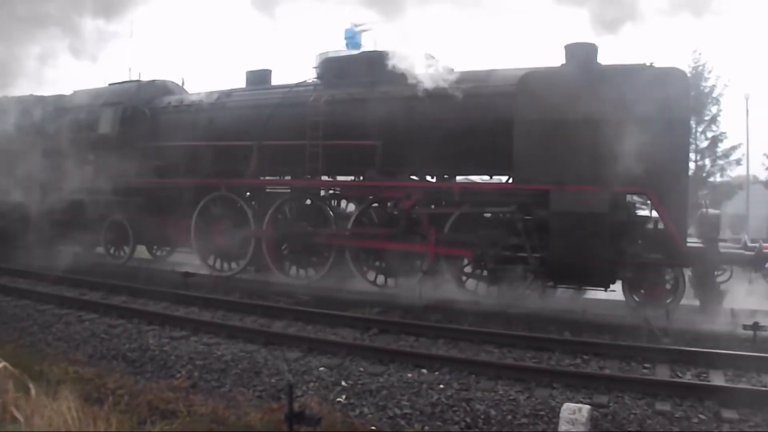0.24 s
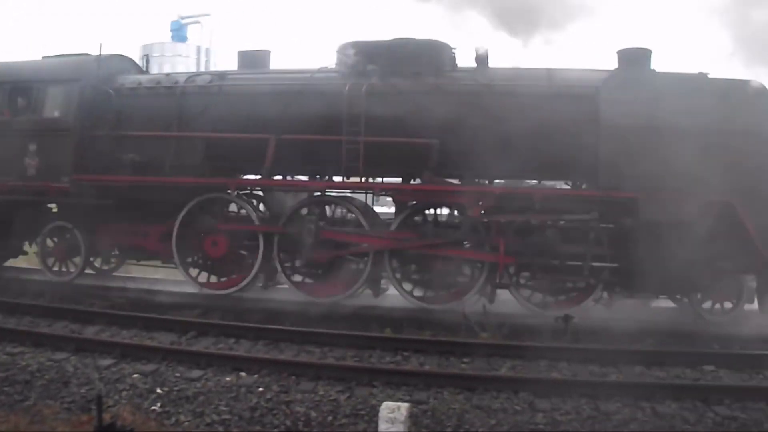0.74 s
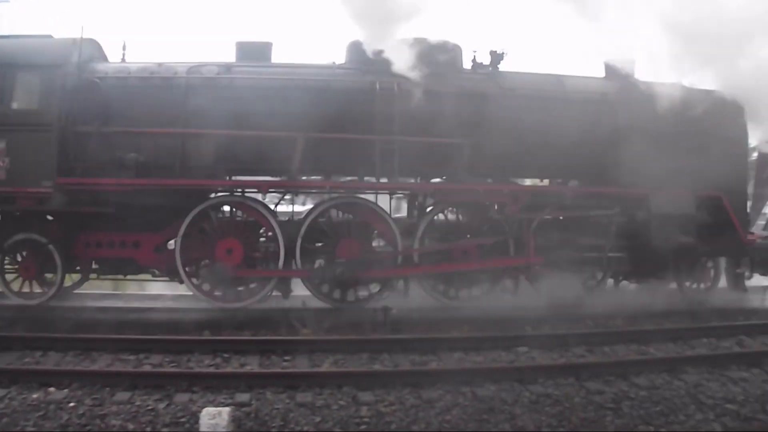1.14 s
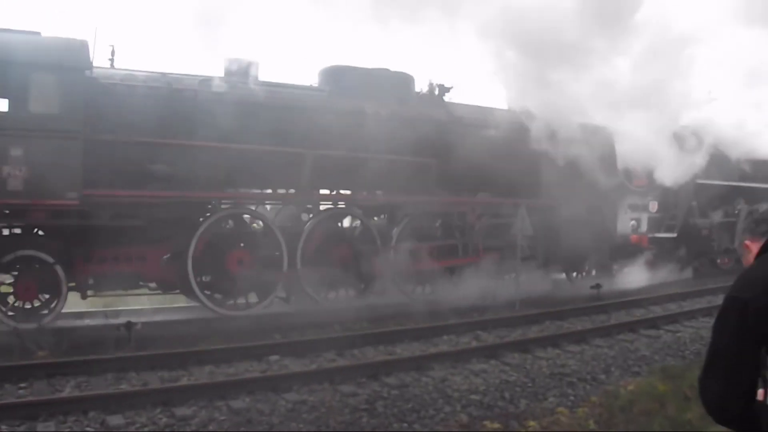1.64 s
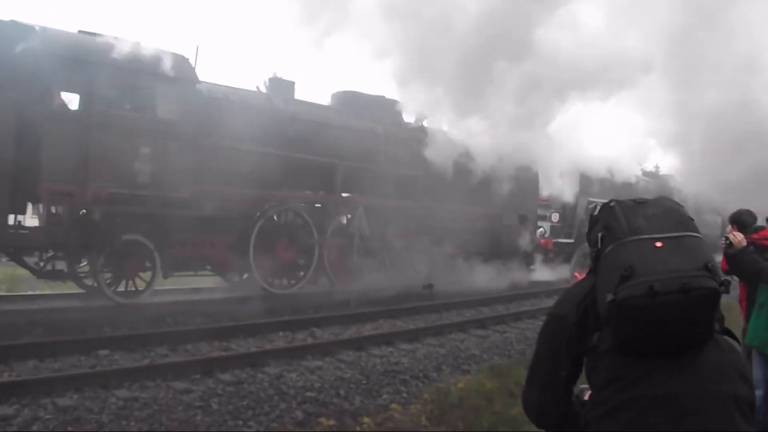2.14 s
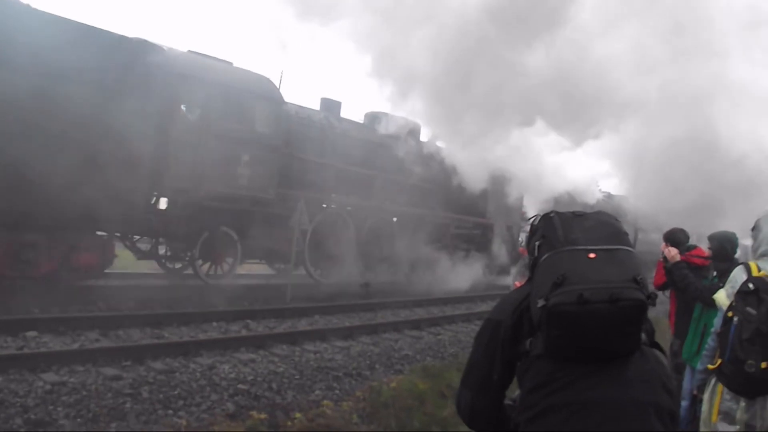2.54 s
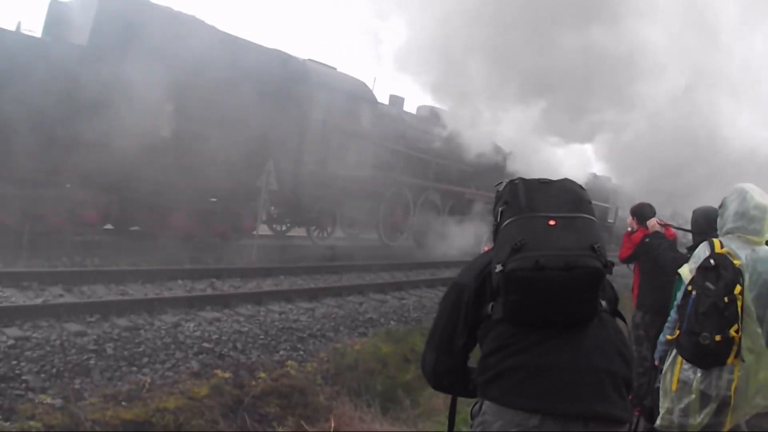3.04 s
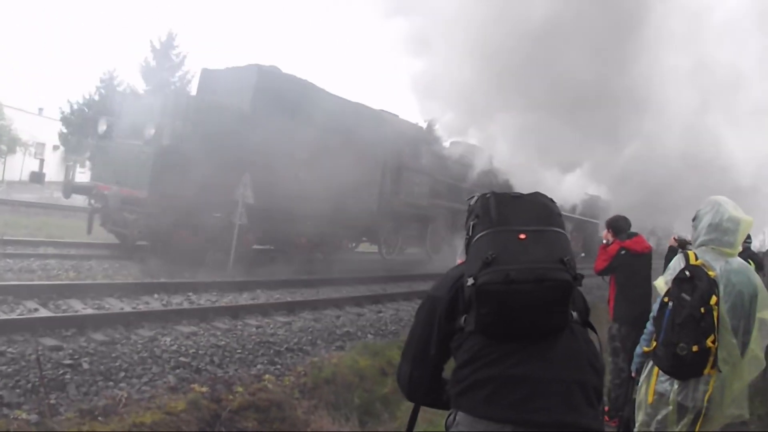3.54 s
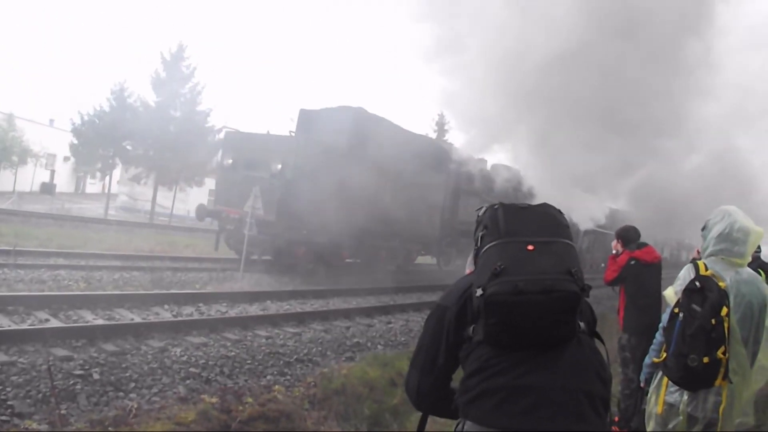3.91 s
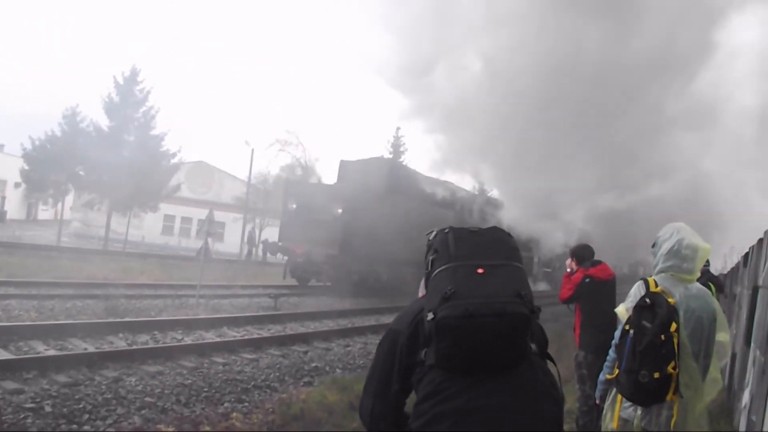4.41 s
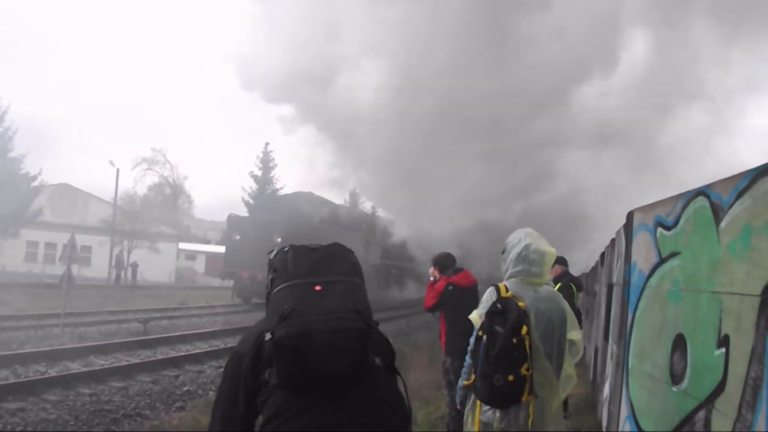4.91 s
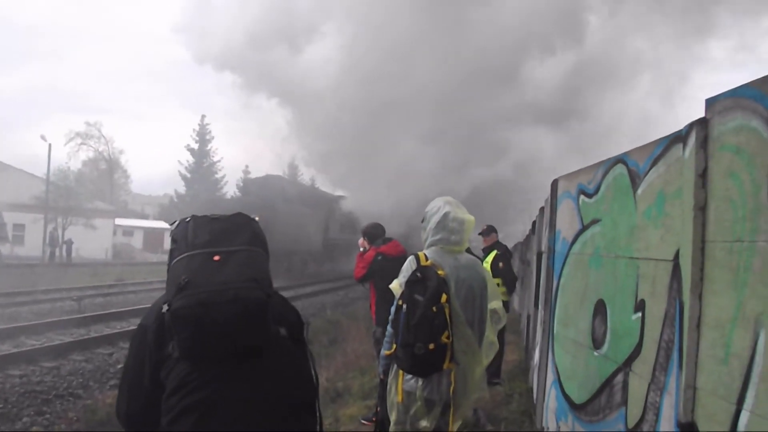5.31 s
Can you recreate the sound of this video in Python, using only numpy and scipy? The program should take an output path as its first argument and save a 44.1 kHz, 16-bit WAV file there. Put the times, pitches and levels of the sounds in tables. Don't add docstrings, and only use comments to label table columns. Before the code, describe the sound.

Several steam locomotive whistles blow together in one long, wavering, dissonant chord over hissing steam and wind rumble, with one harsh crack near the start.

```python
import sys
import numpy as np
from scipy import signal
from scipy.fft import rfft, irfft, next_fast_len
from scipy.io import wavfile
from scipy.ndimage import uniform_filter1d

SR = 44100
rng = np.random.default_rng(int(sys.argv[2]) if len(sys.argv) > 2 else 0)


def persist_wave(psi):
    counts = np.round(np.clip(psi, -1, 1) * 32767).astype(np.int16)
    wavfile.write(sys.argv[1], SR, np.atleast_2d(counts).T)


def rack_gain(trim_db):
    fader = np.asarray(trim_db, float)
    return 10 ** (fader / 20)


N = 245195


def in_time(rows):
    s, *columns = np.transpose(rows)
    return [np.interp(np.arange(N) / SR, s, column) for column in columns]


def bumps(rows):
    t = np.arange(N) / SR
    return sum(db * np.exp(-((t - s) / half_s) ** 2) for s, half_s, db in rows)


def drift(rate_hz, size=N):
    r = np.exp(-80 * np.pi * rate_hz / SR)
    coarse = rng.standard_normal(N // 40 + 2002)
    slow = signal.lfilter([1], [1, -2 * r, r * r], coarse)[2000:]
    return np.interp(np.arange(size) / 40, np.arange(len(slow)), slow / slow.std())


def whistle(pitch_hz, harmonics, wobble, rough, rough_hz):
    size = len(pitch_hz)
    unsteady_hz = pitch_hz * (1 + wobble * drift(8.18, size))
    phase = 2 * np.pi * np.cumsum(unsteady_hz) / SR
    out = np.zeros(size)
    for k, level_db in harmonics:
        shake = rough * k ** 0.55
        along = 1 + shake * drift(rough_hz, size)
        across = shake * drift(rough_hz, size)
        tone = along * np.sin(k * phase) + across * np.cos(k * phase)
        out += rack_gain(level_db) * np.sqrt(2 / (1 + 2 * shake ** 2)) * tone
    return out


def ground_echo_db(k, favoured):
    width = 0.51
    first = np.exp(-((k - favoured) / width) ** 2)
    higher = np.exp(-3.7 * ((k / 2.3 - favoured) / width) ** 2)
    return 10 * (first + 0.6 * higher)


# [s, Hz, dB, dB, number].
DEEP = [ (0, 404.4, -13, -30.5, 2.8), (.43, 403.1, -13.5, -34.5, 2.63), (.57, 402.5, -11, -30.5, 2.46),
        (.86, 406, -12.5, -31, 3.1), (1.3, 405.7, -15.5, -33.5, 3.12), (1.57, 407.2, -16.5, -27, 2.8),
        (1.76, 407.3, -29.5, -23.5, 3.14), (1.88, 407.2, -17.5, -21.5, 3.4), (2.15, 404.7, -20.5, -27, 3.3),
        (2.33, 405.6, -25, -22.5, 4.8), (2.75, 406.6, -21.5, -27, 4.05), (3.2, 407.4, -25.5, -25, 5),
        (3.45, 407, -26, -32.5, 4.04), (4.04, 408.9, -21, -33.5, 3.13), (4.4, 409.2, -26.5, -37.5, 3.22),
        (4.8, 405.5, -23.5, -43, 3.1), (5.25, 408, -21.5, -32, 3.44), (5.56, 408.3, -24.5, -36.5, 3.8)]
# [number, dB].
DEEP_LOW = [(2, -0.3), (3, -2), (4, -1.5)]
DEEP_TOP = [(5, -10.5), (6, -5), (7, -11.5), (8, -11.5), (9, -23.5), (10, -27.5)]


def deep():
    pitch_hz, level_db, over_db, favoured = in_time(DEEP)
    harmonics = [(1, level_db)]
    for k, db in DEEP_LOW:
        fading_db = 1.5 * drift(2.9)
        harmonics.append((k, over_db + db + ground_echo_db(k, favoured) + fading_db))
    shared_db = 0.55 * ground_echo_db(4, favoured)
    for k, db in DEEP_TOP:
        fading_db = 1.5 * drift(1.0)
        harmonics.append((k, over_db + db + ground_echo_db(k, favoured) + shared_db + fading_db))
    return whistle(pitch_hz, harmonics, wobble=0.00144, rough=0.13, rough_hz=13.0)


# [s, Hz, dB, dB].
SECOND = [ (0, 447, -39, -36.5), (.23, 452, -37, -36), (.43, 452.5, -35.5, -35), (.6, 454, -32.5, -40),
          (1.2, 451.3, -25, -35.5), (1.51, 451.7, -23.5, -30), (1.9, 450.5, -27, -35.5),
          (2.1, 447.5, -23.5, -31.5), (2.47, 449.8, -25.5, -25), (2.85, 450.4, -22.5, -27),
          (3.05, 448.4, -22, -24), (3.3, 450, -22, -23.5), (3.85, 451, -28.5, -28), (4.08, 448, -24.5, -32),
          (4.2, 451, -33.5, -31), (4.58, 449.3, -25.5, -30), (5.0, 452.6, -36.5, -30.5),
          (5.56, 451, -27, -26.5)]
# [number, dB].
SECOND_TOP = [(2, -16), (3, -0.5), (4, -2.5), (5, -5.5), (6, -3.5), (7, 0), (8, -26)]
# [s, dB per harmonic].
SECOND_BITE = [(0, 1.5), (.25, 2.5), (.7, -2), (1.2, -0.5), (1.9, -2.5), (2.4, 0.7), (3.3, -0.3),
               (3.9, 0.7), (4.1, -0.6), (4.9, 3), (5.4, -0.3)]


def second():
    pitch_hz, level_db, over_db = in_time(SECOND)
    tilt_db = in_time(SECOND_BITE)[0]
    harmonics = [(1, level_db)]
    for k, db in SECOND_TOP:
        harmonics.append((k, over_db + db + (k - 5) * tilt_db + 1.4 * drift(1.1)))
    return whistle(pitch_hz, harmonics, wobble=0.00154, rough=0.13, rough_hz=13.4)


def blast(rows, pipe, edge_db, turn_s):
    (second_db, fourth_db), top = pipe
    span = slice(round(rows[0][0] * SR), round(rows[-1][0] * SR))
    pitch_hz, first_db, third_db = [column[span] for column in in_time(rows)]
    force_db = 10 * np.log10(rack_gain(first_db) ** 2 + rack_gain(third_db) ** 2)
    facing_db = in_time([(turn_s - 0.17, -11), (turn_s, 0)])[0][span]
    edge = force_db + edge_db + facing_db
    harmonics = [(1, first_db), (2, third_db + second_db), (3, third_db), (4, third_db + fourth_db)]
    harmonics += [(k, edge + db) for k, db in top]
    valve_s = 0.006
    valve = signal.windows.tukey(len(pitch_hz), 2 * valve_s * SR / len(pitch_hz))
    out = np.zeros(N)
    out[span] = valve * whistle(pitch_hz, harmonics, wobble=0.0008, rough=0.115, rough_hz=16)
    return out


# harmonic number,
# level over the bright edge in dB [number, dB]. Air dulls the top of the far one.
OPEN_PIPE = (-14, -7), [(5, -2), (6, 0), (7, -4), (8, -12.5), (9, -19), (10, -20), (12, -26.5)]
OPEN_PIPE_FAR = (-14.5, -6.5), [(5, 3), (6, 3.5), (7, -7.5), (8, -17.5), (9, -33)]
STOPPED_PIPE = (-12, -13), [(5, 2), (6, -20)]
# [s, Hz, dB, dB].
NEAR_BLAST = [(.1, 843, -40, -38), (.25, 834, -28, -27.5), (.8, 830, -28.5, -23),
              (.95, 823.5, -33.5, -31.5), (1.06, 824.4, -23.5, -29), (1.5, 827.4, -21, -25),
              (1.65, 824, -24.5, -19.5), (1.77, 820, -27, -19), (1.88, 766, -37, -44)]
HIGH_BLAST = [(0, 908.7, -40, -24), (.44, 907.8, -34.5, -34), (.85, 914.6, -36.5, -23.5),
              (1.05, 910.5, -24.5, -26), (1.3, 904, -28.5, -33.5), (1.55, 914, -27, -21),
              (1.635, 908, -33, -32), (1.68, 849, -21, -33), (1.73, 760, -55, -41)]
WARM_UP = [(2.3, 792, -62, -43), (2.45, 784.5, -25.5, -33), (2.7, 798.3, -29, -42.5), (3.1, 799, -27, -30),
           (3.3, 788, -31.5, -29), (3.36, 821, -19, -25)]
LONG_BLAST = [(3.36, 812, -18, -26), (3.449, 826, -20.5, -20), (3.7, 820.6, -22.5, -20.5),
              (4.05, 828.5, -17, -20.5), (4.299, 821.6, -23.5, -15), (4.7, 826, -22.5, -18.5),
              (4.898, 827, -21.5, -23.5), (5.098, 829.7, -23.5, -23), (5.56, 827, -25.5, -20)]
LOW_BLAST = [(2.7, 712.4, -38, -55), (2.8, 751, -32, -55), (3.1, 751, -31.5, -39), (3.45, 780, -39.5, -54),
             (4.3, 778, -34, -53), (5.2, 810, -50, -48)]
LATE_BLAST = [(3.45, 803, -33, -51), (3.55, 783, -26, -23.5), (4.0, 799.3, -34.5, -37.5),
              (4.45, 798.2, -28, -30.5), (4.55, 823, -23, -19), (4.65, 820, -38, -37),
              (4.85, 826.3, -36, -13)]
RISING_BLAST = [(4.85, 822, -38, -30), (4.96, 840.4, -31.5, -20.5), (5.06, 874.3, -23.5, -34),
                (5.17, 880, -22, -17), (5.35, 883.5, -24.5, -23), (5.56, 875.3, -20.5, -21)]


def shrill():
    out = blast(NEAR_BLAST, OPEN_PIPE, edge_db=-19.5, turn_s=1.0)
    out += blast(HIGH_BLAST, STOPPED_PIPE, edge_db=-29.5, turn_s=0)
    out += blast(WARM_UP + LONG_BLAST[1:], OPEN_PIPE_FAR, edge_db=-27, turn_s=4.0)
    out += blast(LOW_BLAST, STOPPED_PIPE, edge_db=-17.5, turn_s=0)
    out += blast(LATE_BLAST + RISING_BLAST[1:], STOPPED_PIPE, edge_db=-15.5, turn_s=5.3)
    return out


# [Hz, dB].
FAINT = [(470, -42), (935, -43.5), (1413, -47), (762, -46.5)]


def far_whistles():
    out = np.zeros(N)
    for hz, db in FAINT:
        harmonics = [(1, db + 2.0 * drift(0.68))]
        out += whistle(np.full(N, hz), harmonics, wobble=0.00328, rough=0.65, rough_hz=6.8)
    return out


def noise(spectrum, low_hz, high_hz, patchy_db):
    size = next_fast_len(N)
    hz = np.arange(size // 2 + 1) * SR / size + 1e-3
    point_hz, point_db = np.transpose(spectrum)
    shape = rack_gain(np.interp(np.log(hz), np.log(point_hz), point_db, left=-90, right=-90))
    band = (hz > low_hz) & (hz < high_hz)
    shape = shape / np.sqrt(np.sum(shape[band] ** 2) / len(hz))
    coloured = irfft(rfft(rng.standard_normal(size)) * shape, size)[:N]
    return coloured * rack_gain(patchy_db * drift(6.8))


# [s, dB, dB].
STEAM = [ (0, -30.5, -56), (.16, -31, -52.5), (.34, -36, -59), (.46, -28, -58.5), (.6, -34, -57.5),
         (.93, -31.5, -56), (1.35, -29.5, -50.5), (1.63, -27.5, -43.5), (1.8, -31.5, -50),
         (1.9, -27.5, -52), (2.47, -25.5, -54), (3.0, -26, -53.5), (3.7, -25.5, -56.5), (4.4, -28.5, -58),
         (4.55, -27.5, -65.5), (4.68, -27, -65), (5.2, -28, -63), (5.56, -26, -68)]


def steam_db(mean_db, flow_share, near_share):
    flow_db, near_db = in_time(STEAM)
    return mean_db + flow_share * (flow_db - flow_db.mean()) + near_share * (near_db - near_db.mean())


# [Hz, dB per Hz].
JET = [(1600, -7.5), (2000, -3), (2400, 0), (3000, 7), (3400, -0.5), (3800, -9), (4400, -16.5), (5200, -41)]


def jet():
    return rack_gain(in_time(STEAM)[0] - 2.67) * noise(JET, 2956, 3036, patchy_db=0.3)


# [Hz, dB per Hz].
ROAR = [(300, -17), (420, 9), (530, -6), (800, 2), (1050, -4), (1400, 4.5), (1800, -2), (2200, -18.5)]


def roar():
    return rack_gain(steam_db(-44.5, 1.2, 0.3)) * noise(ROAR, 953, 1153, patchy_db=2.0)


# [Hz, dB per Hz].
LEAK = [(3300, -5), (4000, 6.5), (5300, 2), (6200, -4.5), (7500, -14), (9000, -20)]
# [s, s, dB].
PUFFS = [
    (.16, .1, 0),
    (1.62, 0.11, 1),
    (3.2, 0.15, 0.5),
    (3.54, 0.021, 5),
    (3.75, 0.098, 5.5),
]


def leak():
    return rack_gain(steam_db(-47.5, 0.98, 0.17) + bumps(PUFFS)) * noise(LEAK, 5156, 5560, patchy_db=0.4)


# [Hz, dB per Hz].
HISS = [(5200, -2), (6500, 6), (8000, 1), (10500, -3), (12000, -9.5), (14000, -16.5), (16500, -13.5)]


def hiss():
    return rack_gain(in_time(STEAM)[1] - 0.85) * noise(HISS, 8900, 14000, patchy_db=1.4)


# [Hz, dB per Hz].
WIND = [(8.8, -23), (15, 10), (30, -4), (70, -13.5), (120, -17), (173, -13.5), (330, -20.5), (430, -66.5)]
# [s, dB].
SLIPSTREAM = [(0, -36), (.25, -38), (.6, -35), (1.4, -31.5), (2.7, -31), (3.64, -35), (4.4, -36),
              (5.56, -39)]
# [s, s, dB].
GUSTS = [
    (0, 0.053, 2.5),
    (1.5, .05, 5),
    (2.17, .04, 5),
    (2.87, 0.015, 5),
    (4.47, 0.037, 5),
]


def wind():
    return rack_gain(in_time(SLIPSTREAM)[0] + bumps(GUSTS) - 0.14) * noise(WIND, 17.5, 320, patchy_db=0.0)


def scene():
    whistles = deep() + second() + shrill() + far_whistles()
    steam = jet() + roar() + leak() + hiss()
    return (whistles + steam + wind())[None]


STEP_DB = 1.5
# [s, s, count, dB].
CRESTS = [(.5537, .5961, 2, -3.1), (.6722, .7347, 2, -3.7), (.8412, 1.089, 2, -4),
          (1.1569, 1.2426, 2, -2.4), (1.4125, 1.5134, 2, -2.9), (1.6749, 1.8217, 2, -3.5),
          (1.883, 1.947, 2, -3.1), (2.0926, 2.3627, 4, -3.6), (2.4276, 2.5697, 2, -2.6),
          (2.67, 2.7773, 3, -3.7), (2.895, 3.0102, 2, -4), (3.0659, 3.1396, 2, -3.3),
          (3.2746, 3.368, 3, -3.4), (3.4543, 3.7888, 4, -3.4), (3.8313, 3.9334, 2, -3.4),
          (4.0065, 4.1078, 2, -3.6), (4.1272, 4.25, 2, -3.7), (4.2951, 4.3705, 2, -3.9),
          (4.4842, 4.5536, 2, -3.4), (4.6878, 4.709, 2, -3.5), (4.7996, 4.8877, 2, -5.9),
          (4.9972, 5.1502, 3, -6.4), (5.2667, 5.3236, 2, -5.5), (5.4316, 5.504, 2, -4.5)]


def pumping_db():
    change_db = np.zeros(N)
    hold = round(0.032 * SR)
    cuts = []
    for first_s, last_s, count, db in CRESTS:
        cuts += [(round(s * SR), db) for s in np.linspace(first_s, last_s, count)]
    for (at, db), (until, _) in zip(cuts, cuts[1:] + [(N, 0)]):
        change_db[at] += db
        change_db[at + hold:until:hold] += STEP_DB
    return np.cumsum(change_db)


# [s, dB].
SURGE = [
    (.4537, 26),
    (.475, 34.5),
    (.495, 7.5),
    (.51, 0),
    (.56, -0.5),
    (.6, -1),
]


def glitch_db():
    started = np.arange(N) >= SURGE[0][0] * SR
    return STEP_DB * np.round(in_time(SURGE)[0] / STEP_DB) * started


def low_pass(x):
    return signal.sosfilt(signal.butter(12, 16010, fs=SR, output="sos"), x)


def record(dry):
    clock = np.arange(N)
    wave = dry[0]
    steps_db = pumping_db()
    slow_db = uniform_filter1d(uniform_filter1d(steps_db, SR // 5), SR // 5)
    steps_db = steps_db + glitch_db()
    crossed = np.diff(np.sign(wave), prepend=0) != 0
    turned = np.diff(np.sign(np.gradient(wave)), prepend=0) != 0
    crest = turned & (np.abs(wave) > 1.7 * dry.std())
    waited_db = steps_db[np.maximum.accumulate(clock * crossed)]
    ticking_db = steps_db[np.maximum.accumulate(clock * crest)]
    gain_db = waited_db + 0.35 * (ticking_db - waited_db) - slow_db
    return low_pass(np.clip(dry * rack_gain(gain_db), -1, 1))


dry = scene()
out = record(dry)
persist_wave(out)
```